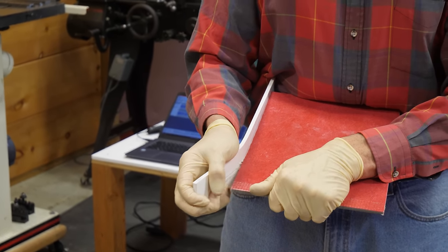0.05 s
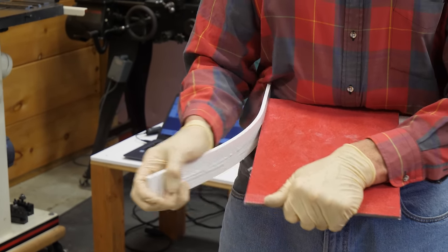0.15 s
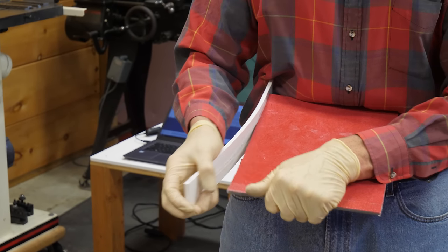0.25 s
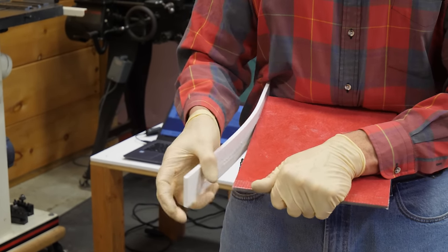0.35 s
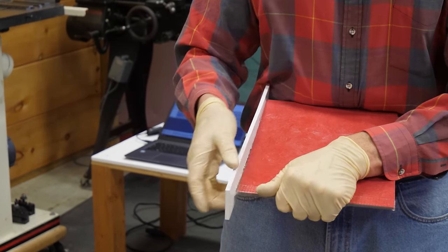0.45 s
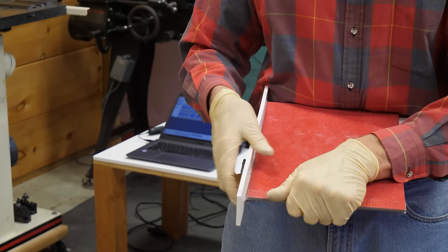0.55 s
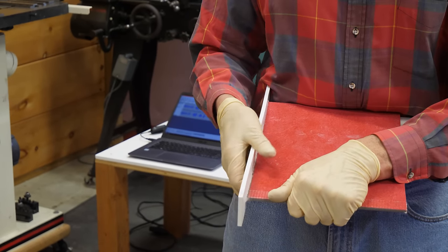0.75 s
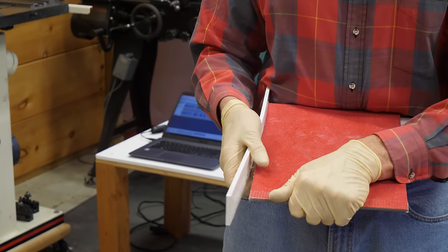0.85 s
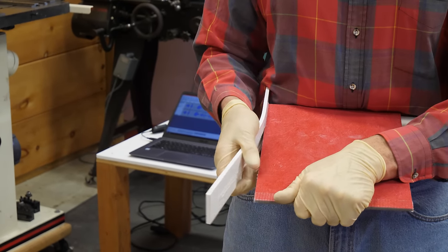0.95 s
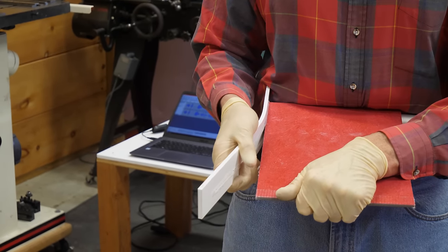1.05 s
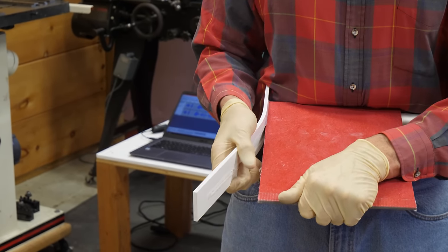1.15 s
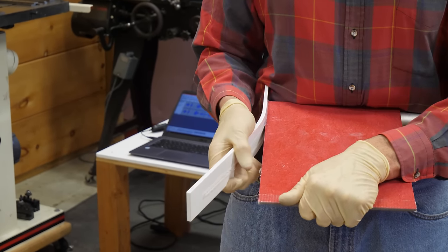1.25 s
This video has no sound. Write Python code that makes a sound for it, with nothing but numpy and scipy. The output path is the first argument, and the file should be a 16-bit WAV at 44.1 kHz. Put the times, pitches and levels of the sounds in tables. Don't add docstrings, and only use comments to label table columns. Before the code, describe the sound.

Hardened glue snapping between a plastic strip and resin panel: faint air and low rumble first, small crackles from 0.11 s, then a volley of very loud, splintery, down-gliding snaps at 0.21-0.27 s, overloading the close microphone. Panel and workshop ring away. Soft knocks, ticks and rubber glove rubs come around 0.45-0.65 s, fainter rubbing later, and a small click and knock near 1.0 s.

```python
import sys
import numpy as np
from scipy import signal
from scipy.fft import rfft, irfft
from scipy.io import wavfile
from scipy.ndimage import uniform_filter1d

SR = 44100
rng = np.random.default_rng(int(sys.argv[2]) if len(sys.argv) > 2 else 0)


def dump(signal):
    limited = np.clip(np.atleast_2d(signal).T, -1, 1)
    pcm = np.round(limited * 32767).astype(np.int16)
    wavfile.write(sys.argv[1], SR, pcm)


def voltage_ratio(decibels):
    exponent = np.asarray(decibels, float) / 20
    return 10 ** exponent


N = 57330
T = np.arange(N) / SR


def read(points, hz):
    point_hz, value = np.transpose(points)
    return np.interp(np.log(hz + 1), np.log(point_hz + 1), value)


def add(mix, start_s, sound):
    part = mix[round(start_s * SR):][:len(sound)]
    part += sound[:len(part)]


def coloured(x, points):
    gain = voltage_ratio(read(points, np.fft.rfftfreq(len(x), 1 / SR)))
    y = irfft(rfft(x) * gain, len(x))
    return y / np.sqrt(np.mean(y ** 2))


def noise(points):
    return coloured(rng.standard_normal(N), points)


def sine(hz, t):
    return np.sin(2 * np.pi * hz * t)


# pitch_hz, level_db
AIR_COLOUR = [(59, -39.5), (100, 0), (459, -5.5), (1600, -15), (2060, -11), (3220, -17.5), (3740, -15.5),
              (15800, -21.5)]
# pitch_hz, level_db
RUMBLE_COLOUR = [(15, -11), (30, -0.5), (60, -14), (110, -26), (200, -45)]
# pitch_hz, level_db
LINGER_COLOUR = [(120, -53), (200, -23), (946, -2), (1040, -13), (1220, -0.5), (2420, -9), (15000, -22)]


def workshop_air():
    air_db, rumble_db, linger_db, linger_t60_s = -63.5, -59.5, -54, 0.5
    lumps = uniform_filter1d(rng.standard_normal(N), 3000)
    swell_db = 1.5 * lumps / lumps.std()
    air = voltage_ratio(air_db) * noise(AIR_COLOUR)
    rumble = voltage_ratio(rumble_db + swell_db) * noise(RUMBLE_COLOUR)
    linger = voltage_ratio(linger_db - 60 * T / linger_t60_s) * noise(LINGER_COLOUR)
    return air + rumble + linger


# ratio to the ring pitch, level_db
STRIP_OVERTONES = [(1.8, -5), (2.1, -12), (0.43, -6.5), (0.64, -21.5), (0.29, -21)]
# pitch_hz, level_db
SPLINTER_COLOUR = [(880, -25.5), (1500, -1.5), (2760, -3.5), (4220, -2), (6900, -11), (10800, -6.5),
                   (15800, -17.5)]
# pitch_hz, level_db, t60_s
STRIP_THUD = [(616, -9, 0.015), (1006, -7.5, 0.009), (1500, -8, 0.0015)]


def break_glue(rows, sweep, span, overtone_db):
    ring_per_length = 5.92
    out, t, grit = np.zeros(N), T[:3000], noise(SPLINTER_COLOUR)
    for (start_s, ring_db, hz, splinter_db, length), chance in zip(rows, rng.random((len(rows), 12))):
        glide_s = span * length
        turns = hz * (t + sweep * glide_s * (1 - np.exp(-t / glide_s)))
        ring = sine(1, turns)
        for k, (ratio, db) in enumerate(STRIP_OVERTONES):
            uneven_ratio = ratio * (0.88 + 0.22 * chance[k])
            ring = ring + voltage_ratio(db + overtone_db) * sine(1, uneven_ratio * turns + chance[k + 6])
        rise = 1 - np.exp(-t / (0.11 * length))
        ring = voltage_ratio(ring_db - 60 * t / (ring_per_length * length)) * rise * ring
        burst = voltage_ratio(splinter_db - 5.6 * (t / length) ** 1.4) * np.minimum(t / 0.0001, 1)
        burst = burst * grit[round(start_s * SR):][:3000]
        detune = 0.93 + 0.22 * chance[5]
        thud = sum(voltage_ratio(splinter_db + db - 60 * t / t60) * sine(thud_hz * detune, t)
                   for thud_hz, db, t60 in STRIP_THUD)
        add(out, start_s, ring + burst + thud)
    return out


# start_s, ring_db, ring_hz, splinter_db, length_s
SMALL_CRACKS = [(.078, -71.5, 3000, -63, 0.0012), (.1107, -37, 4400, -39.5, 0.0012),
                (.1116, -34.5, 4600, -40.5, .0006), (.1124, -33.5, 3787, -42, 0.0011),
                (.1284, -21.5, 1150, -35.5, 0.0015), (.1346, -26, 1500, -30.5, 0.0019),
                (.1556, -39.5, 2029, -39.5, 0.0016), (.1575, -43, 3545, -44, 0.0024),
                (.1632, -29.5, 1300, -37.5, 0.0006), (.1645, -38.5, 4004, -43.5, 0.00083),
                (.1783, -32, 2000, -24, .001), (.1858, -43, 2500, -29, 0.00081),
                (.1893, -41.5, 2004, -32.5, 0.0015), (.1922, -47, 2958, -34.5, .002),
                (.1955, -27.5, 1577, -22, 0.0016), (.2036, -23, 3930, -21.5, 0.0007)]
# start_s, ring_db, ring_hz, splinter_db, length_s
LATE_TICKS = [(.450, -37, 4380, -61, 0.0017), (.485, -58, 2960, -45.5, 0.0037),
              (.501, -45, 1500, -42, 0.00138), (.5318, -31, 12730, -40, 0.00052),
              (.5463, -43, 12460, -43, 0.00045), (.5625, -34, 2487, -43, 0.0008),
              (.578, -41, 2213, -59, 0.0025), (.546, -29.5, 1786, -47.5, 0.0019),
              (.557, -33, 10200, -46, 0.00095), (.697, -50.5, 2400, -66, 0.004),
              (.780, -43.5, 623, -64, 0.0031), (.890, -51.5, 2805, -50, 0.0014),
              (.9882, -30, 2310, -35, 0.00054), (.9884, -27, 5700, -69, 0.00026),
              (1.0065, -49.5, 3800, -48.5, 0.00082), (1.0095, -52, 2400, -40, .001),
              (.907, -70, 2945, -70, 0.0009), (1.0115, -49.5, 8050, -44, 0.002),
              (1.027, -48, 2585, -49.5, 0.00048), (1.0305, -46, 3910, -70.5, 0.0012)]


def small_cracks():
    return break_glue([*SMALL_CRACKS, *LATE_TICKS], sweep=0.12, span=0.32, overtone_db=-3)


# pitch_hz, level_db, t60_s
PANEL_TONES = [(343.3, -34, .2), (455, -31.5, .15), (507, -31.5, 0.17), (573.8, -20, 0.19),
               (586, -23.5, 0.18), (648, -29.5, .15), (960, -33, 0.17), (1150, -35.5, .15), (1230, -38, .3),
               (1385, -37, 0.11), (1454, -37, 0.53), (1530, -37.5, .2), (2085, -41.5, .05),
               (2520, -37, .05)]


def panel_ring(jolts):
    t = T[:SR // 2]
    tones = sum(voltage_ratio(db - 60 * t / t60) * sine(hz, t) for hz, db, t60 in PANEL_TONES)
    return signal.fftconvolve(jolts, voltage_ratio(-30.0) * tones)[:N]


# pitch_hz, t60_s
ROOM_DECAY = [(150, 0.96), (500, 0.54), (1500, 0.52), (4500, 0.39), (12000, 0.26)]
# pitch_hz, level_db
ROOM_COLOUR = [(150, -17.5), (330, -8), (600, -9.5), (1000, -2), (1480, -8.5), (2200, -10.5), (4500, -7.5),
               (7000, -3), (14000, -1.5)]
# delay_s, level_db
FIRST_ECHOES = [(.0068, -16.5), (0.013, -23), (.017, -21.5)]


def room_echo(x):
    room_db, gap_s, spacing = -8, 0.0073, 10
    taps = np.zeros(SR)
    at = np.arange(round(gap_s * SR), SR - 20, spacing)
    draw = rng.random((SR // spacing, 2))[:len(at)]
    taps[at + (spacing * draw[:, 0]).astype(int)] = np.sign(draw[:, 1] - 0.5)
    hz, t, bands = signal.stft(taps, SR, nperseg=256)
    bands = bands * voltage_ratio(read(ROOM_COLOUR, hz)[:, None] - 60 * t / read(ROOM_DECAY, hz)[:, None])
    tail = signal.istft(bands, SR, nperseg=256)[1]
    tail = voltage_ratio(room_db) * tail / np.linalg.norm(tail)
    for delay_s, db in FIRST_ECHOES:
        add(tail, delay_s, np.array([voltage_ratio(db)]))
    return signal.fftconvolve(x, tail)[:N]


# start_s, ring_db, ring_hz, splinter_db, length_s
CLEAN_SNAPS = [
    (.2108, 10, 1385, -10.5, 0.0026),
    (.2230, 5, 1500, -6.5, .0016),
]
# start_s, ring_db, ring_hz, splinter_db, length_s
LOUD_SNAPS = [(.2194, -13.5, 1920, -3.5, 0.002), (.2210, -9.5, 1640, -19.5, 0.0011),
              (.2255, -9.5, 1470, -16.5, 0.0022), (.2310, -11, 1716, -10, 0.0027),
              (.2315, -1.5, 1990, -7, 0.00084), (.2326, 7.5, 4140, -11, 0.0013),
              (.2345, 2, 2873, -12, 0.0022), (.2455, -1.5, 2800, -15.5, 0.0012),
              (.2472, 1.5, 3250, -4, 0.0021), (.2487, 5, 3650, -13.5, 0.002),
              (.2520, -8, 3728, -20.5, .001), (.2610, 1.5, 3300, -11, .0007),
              (.2617, -8, 1900, -19.5, .001), (.2650, -12.5, 1500, -26, .001)]


def loud_snaps():
    top_hz, top_db = 5310, -4
    loud = break_glue(CLEAN_SNAPS, sweep=1.4, span=0.33, overtone_db=-4.5)
    loud = loud + break_glue(LOUD_SNAPS, sweep=0.67, span=0.32, overtone_db=-4.5)
    dull = signal.sosfilt(signal.butter(4, top_hz, fs=SR, output="sos"), loud)
    return dull + voltage_ratio(top_db) * (loud - dull)


# start_s, level_db, pitch_hz, t60_s
SOFT_KNOCKS = [(0.211, -4, 193, 0.023), (0.2115, -20, 85, 0.071), (0.2112, -22, 540, 0.02),
               (0.232, -15.5, 342, 0.05), (0.232, -28, 126, 0.051), (0.2483, -10, 260, 0.023),
               (.262, -35.5, 156.4, 0.13), (0.247, -25.5, 72, 0.064), (.248, -13, 800, 0.008),
               (0.373, -40.5, 33.3, 0.23), (0.4849, -27, 124, 0.026), (.497, -36.5, 591, 0.058),
               (.507, -39.5, 103.7, 0.13), (0.55, -30.5, 100, 0.032), (0.5623, -27, 159, 0.044),
               (.563, -28, 555, 0.08), (0.5647, -38, 454.5, 0.2), (0.581, -39.5, 87.3, .05),
               (1.005, -40.5, 316, 0.073), (1.007, -46.5, 960, .03), (1.009, -56, 600, .03),
               (1.011, -40.5, 89.3, 0.17), (1.025, -56, 111.8, .08), (1.024, -51, 22.98, 0.29),
               (1.092, -40.5, 23.35, 0.28)]


def knocks():
    out, t = np.zeros(N), T[:9000]
    rise = 1 - np.exp(-t / 0.0014)
    for start_s, db, hz, t60 in SOFT_KNOCKS:
        add(out, start_s, voltage_ratio(db - 60 * t / t60) * rise * sine(hz, t))
    return out


# start_s, length_s, body_db, fizz_db
GLOVE_RUBS = [(0.455, 0.088, -53.5, -56.5), (0.522, 0.061, -43.5, -54.5), (0.543, 0.011, -53.5, -48.5),
              (0.554, 0.13, -55.5, -66), (0.602, 0.051, -83, -59), (0.686, 0.03, -62.5, -94),
              (0.782, 0.092, -58.5, -65), (0.74, 0.27, -62, -75), (0.962, 0.05, -59, -77.5),
              (1.003, 0.013, -46.5, -56), (1.012, .03, -75.5, -85.5)]
# pitch_hz, level_db
BODY_COLOUR = [(250, 3.5), (600, -3), (2500, -4.5), (4700, -15), (5500, -41), (8000, -30.5)]
# pitch_hz, level_db
FIZZ_COLOUR = [(4000, -5.5), (8500, -8), (9500, 0), (12000, -2.5), (16000, -6.5)]


def glove_rubs():
    grain = 40
    grain_db = 1.3 * rng.exponential(1, (2, N // grain + 1))
    grains = rng.standard_normal((2, N)) * voltage_ratio(grain_db).repeat(grain, axis=1)[:, :N]
    body, fizz = coloured(grains[0], BODY_COLOUR), coloured(grains[1], FIZZ_COLOUR)
    out = np.zeros(N)
    for start_s, length_s, body_db, fizz_db in GLOVE_RUBS:
        stroke = np.sin(np.pi * np.clip((T - start_s) / length_s, 0, 1) ** 0.8)
        out += stroke * (voltage_ratio(body_db) * body + voltage_ratio(fizz_db) * fizz)
    return out


def scene():
    thin_hz, knock_room_db = 260, -6
    glue = small_cracks() + loud_snaps()
    glue = signal.lfilter(*signal.butter(2, thin_hz, "high", fs=SR), glue)
    near = glue + panel_ring(glue) + glove_rubs()
    thuds = knocks()
    echo = room_echo(near + voltage_ratio(knock_room_db) * thuds)
    return (near + thuds + echo + workshop_air())[None]


def top_cut(x):
    return signal.sosfilt(signal.butter(12, 15910, fs=SR, output="sos"), x)


def record(dry):
    edge_hz = 15900
    lowpass = signal.firwin(301, edge_hz, window=("kaiser", 7), fs=SR)
    limited = signal.oaconvolve(dry, lowpass[None], "same")
    return top_cut(np.clip(limited, -1, 1))


dry = scene()
out = record(dry)
dump(out)
```